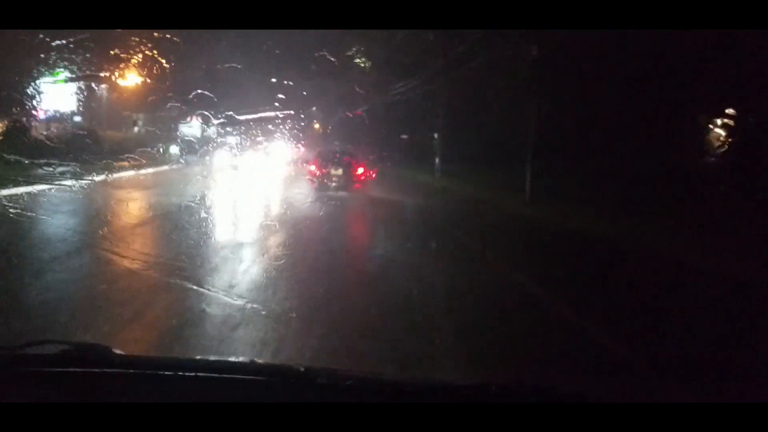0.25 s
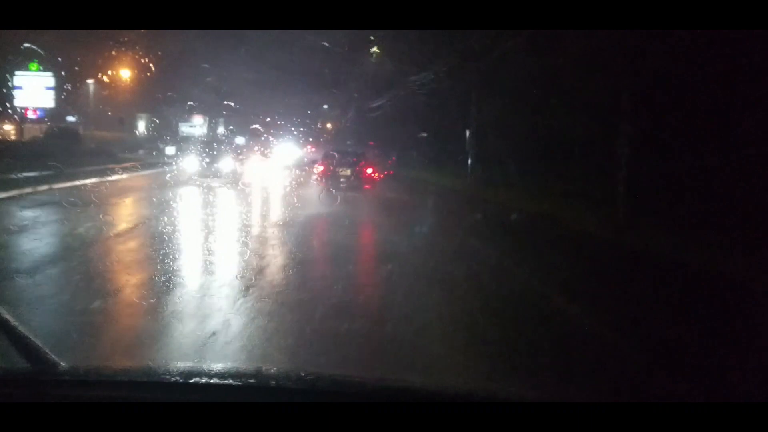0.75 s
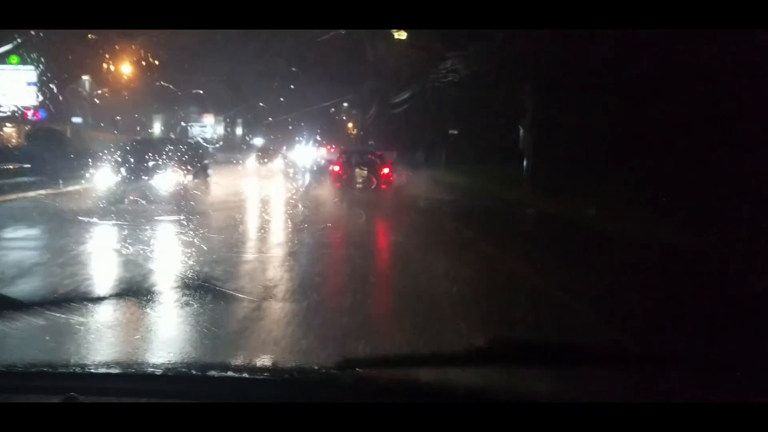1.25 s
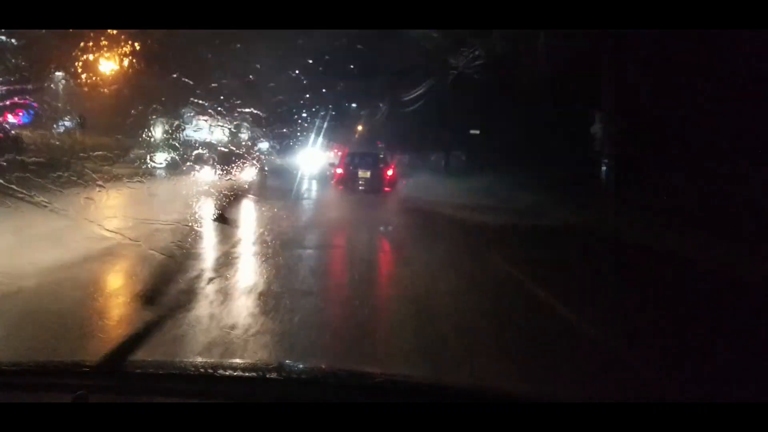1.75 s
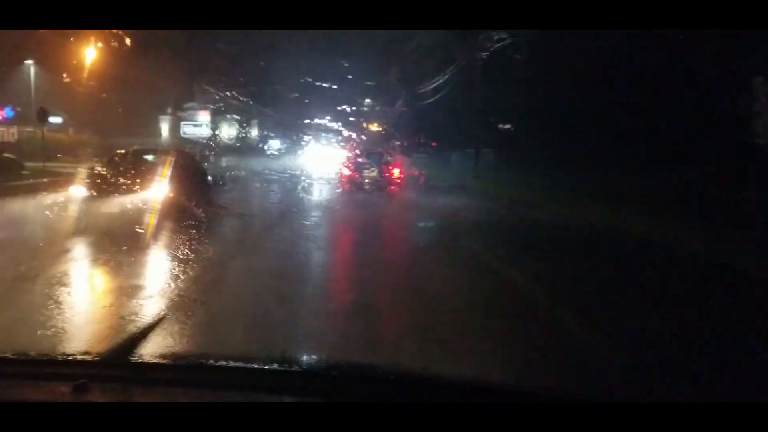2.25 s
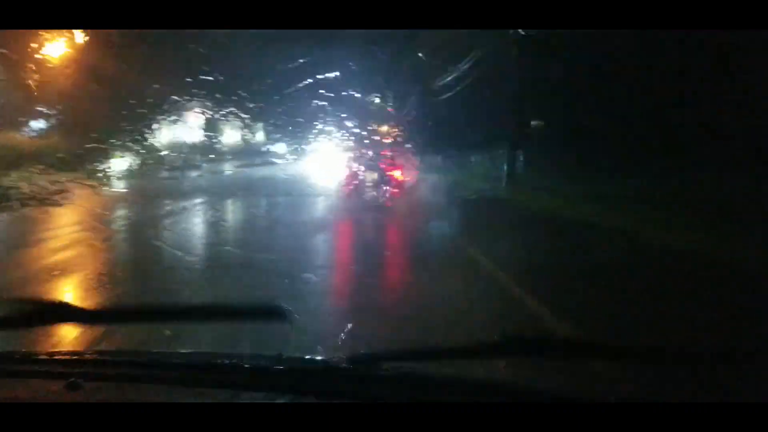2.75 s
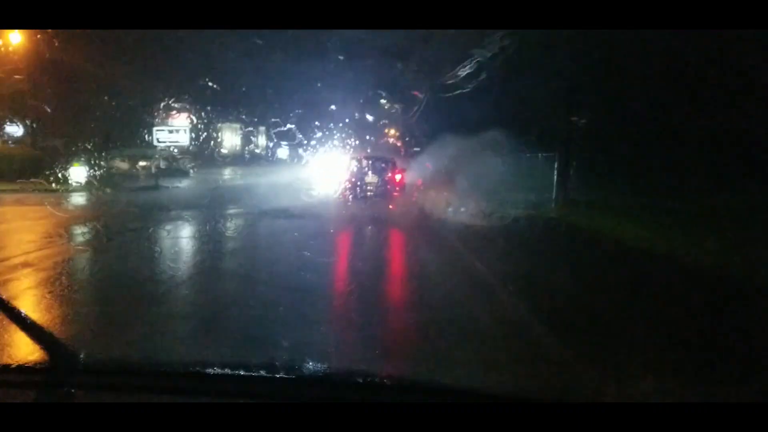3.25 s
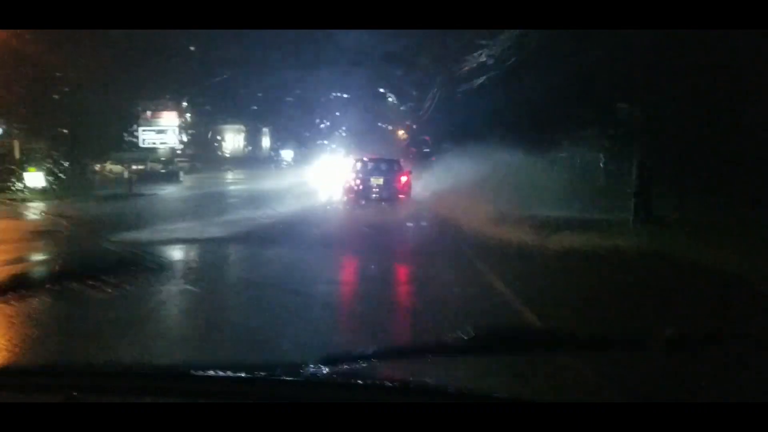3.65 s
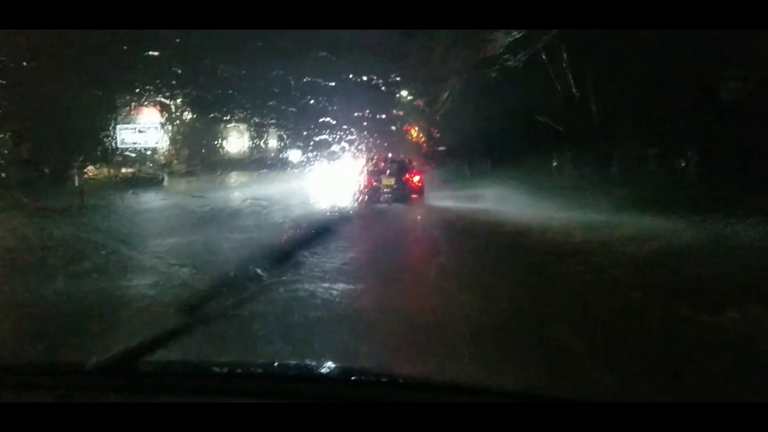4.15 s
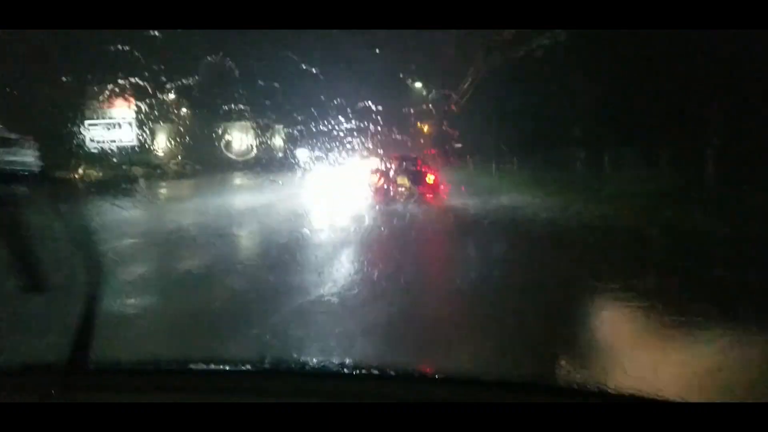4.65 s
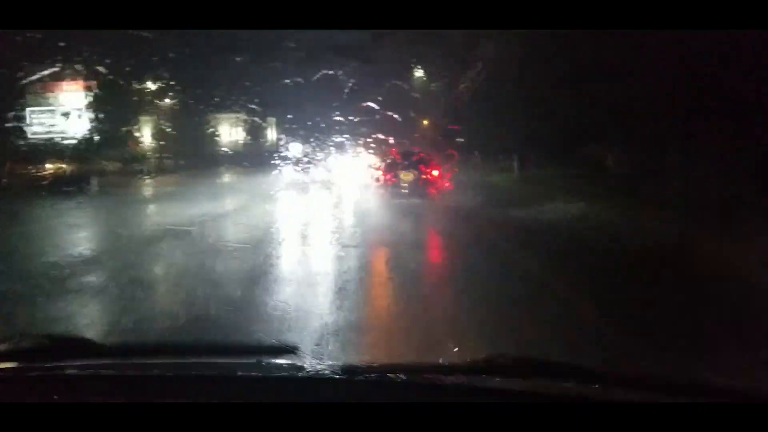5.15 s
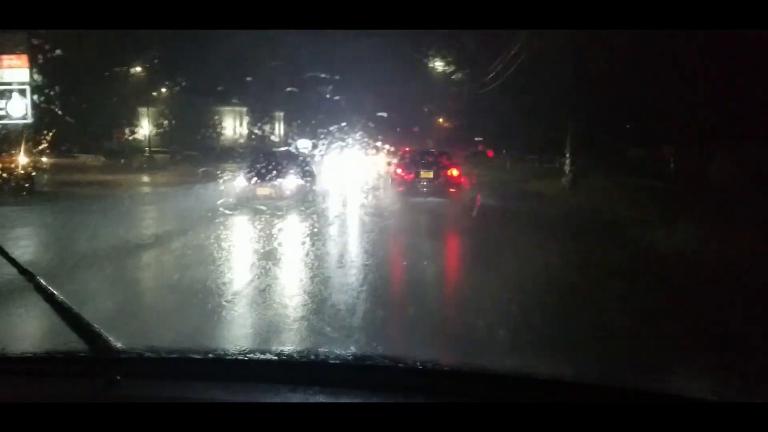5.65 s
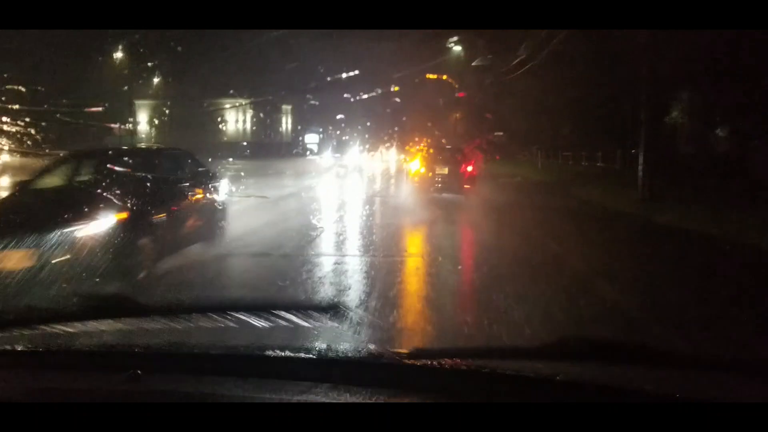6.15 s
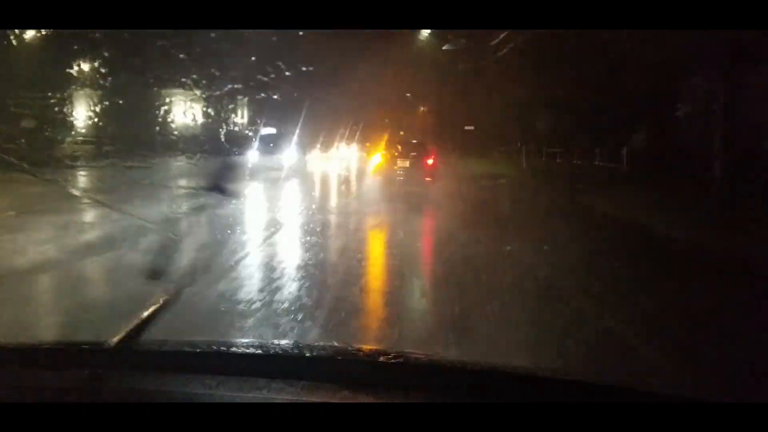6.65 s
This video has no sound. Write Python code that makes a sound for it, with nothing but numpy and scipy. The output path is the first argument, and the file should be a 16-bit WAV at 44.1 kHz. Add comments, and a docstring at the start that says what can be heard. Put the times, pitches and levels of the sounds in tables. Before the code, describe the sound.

Inside a car driving through heavy rain, drops patter on glass and drum on the roof over deep pulsing boom, tyre rumble and wiper knocks.

```python
"""A deep boom swells at once in a car driving through heavy rain: the lowest cabin air mode, nearly a sine.
Rain patters on glass and drums on the roof: coloured noise under random drop envelopes, plus single fat drops.
Wiper blades judder and knock as they turn, driving the cowl modes. Bumps ring body panels; dull knocks sound inside.
Behind lie body rumble, wet tyre roar and one puddle: shaped noise."""
import sys
import numpy as np
from scipy import signal
from scipy.fft import rfft, irfft
from scipy.io import wavfile

SR = 44100
rng = np.random.default_rng(int(sys.argv[2]) if len(sys.argv) > 2 else 0)


def wav_out(sig):
    """Save sig, one row per channel (or a flat mono array), as 16-bit PCM at SR to the path in sys.argv[1]."""
    wavfile.write(sys.argv[1], SR, np.round(np.clip(np.atleast_2d(sig).T, -1, 1) * 32767).astype(np.int16))


N = 304720

# rain between gusts: t/s, patter on glass/dB, roof drumming relative to patter/dB
RAIN_CURVE = [(0.0, -48, 5.5), (0.1, -48, 4.5), (0.6, -47, 6), (0.9, -50, 6.5), (1.2, -48, 5.5),
              (1.78, -47, 5), (1.84, -45.5, 6.5), (2.1, -46, 5), (2.45, -46, 5.5), (2.83, -46, 5),
              (2.88, -47.5, 4.5), (3.45, -46, 5), (3.6, -50.5, 5.5), (4.0, -50, 5), (4.5, -48, 6),
              (4.65, -48.5, 6), (4.85, -49, 5), (5.15, -49, 5.5), (5.45, -47.5, 6.5), (5.8, -48.5, 3),
              (5.95, -54.5, 5.5), (6.4, -53, 7.5), (6.5, -48.5, 4), (6.91, -47.5, 6.5)]
# gusts fling a sheet of rain at the car: peak t/s, patter level/dB
GUSTS = [(0.33, -47), (0.71, -51.5), (1.25, -52), (1.35, -52.5), (1.48, -47), (1.83, -47.5), (2.27, -50),
         (2.54, -50), (2.61, -45.5), (3.52, -55), (3.86, -55), (4.12, -52), (4.33, -52), (4.72, -55),
         (5.56, -51.5), (6.06, -55), (6.62, -52)]
# fat drops on glass: t/s, relative level/dB, pan L-R/dB, top octave against the rest/dB
GLASS_DROPS = [(0.0657, -38, -0.5, -16), (0.636, -31, -6, -20), (0.6918, -29, -0.5, -15),
               (0.755, -26.5, -1.5, -23), (0.839, -26, -1.0, -12.5), (1.3766, -29, 3, -22),
               (1.8127, -32, -0.5, -16), (2.0926, -27, 0.0, -22), (2.1111, -31, 1.0, -19),
               (2.2688, -26, -0.5, -15), (2.456, -28.5, -1.0, -14), (2.597, -26, -0.5, -12),
               (2.7921, -26, -4, -18), (2.831, -29, 0.0, -20), (3.236, -23.5, -0.5, -17),
               (3.4783, -25, -3, -23), (3.6414, -27, -2.5, -18), (3.664, -28, 6, -20),
               (3.7217, -30, 3, -18), (3.854, -29, 0.5, -6), (3.923, -28, 0.0, -14),
               (4.1054, -25.5, 3, -10), (4.3249, -31, 0.5, -12), (4.4754, -27, 3, -21),
               (4.8408, -28, -1.0, -18), (5.549, -28, 0.0, -11), (5.8199, -25, 0.5, -16),
               (6.0507, -28.5, -0.5, -15)]
# fat drops on roof: t/s, relative level/dB, pan L-R/dB
ROOF_DROPS = [(1.0808, -34, -5), (1.815, -29, 0), (3.4185, -28, -7), (4.172, -28, -4), (4.479, -26.5, -6),
              (4.6069, -29, -7), (6.1474, -28, -2.5)]
# colour of rain on glass: f/Hz, relative density/dB per Hz
GLASS_SPECTRUM = [(2060, -27), (3500, -1.5), (7000, -3.5), (7470, -5.5), (8700, -18.5), (11300, -55),
                  (19100, -120)]
# colour of rain on roof: f/Hz, relative density/dB per Hz
ROOF_SPECTRUM = [(590, -24.5), (1000, -2), (1220, -8.5), (1330, -3), (1460, -6.5), (1600, -3.5), (2060, 0),
                 (3030, -6.5), (4500, -12.5), (5850, -23.5), (9900, -120)]
# colour of a fat drop on glass: f/Hz, relative density/dB per Hz
TICK_SPECTRUM = [(700, -32), (1500, 4), (4000, 0.5), (7000, -3.5), (8700, -13), (10000, -50)]
# top octave of the drops: f/Hz, relative density/dB per Hz
SPRAY_SPECTRUM = [(6500, -44), (8700, -8), (12200, 1.5), (15000, -8.5), (16000, -7.5)]
# wiper blades flipping at the end of the sweep: t/s, relative knock level/dB, brightness/dB per octave,
# second blade delay/s, relative second blade level/dB, relative judder level/dB
WIPER_FLIPS = [(0.272, -15.5, -3.5, .016, -19, -39.5), (1.501, -15.5, 1.5, .008, -26, -42),
               (2.73, -39, -3, .03, -38, -47), (3.943, -13.5, -1.5, .039, -22.5, -41.5),
               (5.145, -32, -7, .024, -23, -43.5), (6.399, -18.5, 3.5, .018, -26, -45)]
# cowl modes: f/Hz, relative level/dB, t60/s
COWL_MODES = [(260, -12, 0.052), (340, 4.5, 0.054), (414, -2, 0.044), (553, -0.5, 0.028),
              (684, -0.5, 0.027), (786, -8.5, 0.032), (1010, -9.5, 0.023), (1190, -26, 0.015)]
# cabin boom between swells: t/s, f/Hz, level/dB
BOOM_CURVE = [(0.0, 41, -31), (0.15, 45.4, -23), (0.33, 43.8, -27), (0.5, 47.5, -25), (0.73, 48.65, -27),
              (0.95, 45.43, -28.5), (1.5, 45.43, -26.5), (1.79, 45.1, -28.5), (2.03, 42.07, -27),
              (2.2, 44.1, -27), (2.7, 43.66, -23.5), (3.2, 45.15, -26), (3.35, 43.3, -17.5),
              (3.62, 43.36, -31), (3.8, 43.24, -26.5), (4.48, 43.48, -23), (4.75, 43.52, -27.5),
              (5.1, 43.2, -23.5), (5.5, 42.4, -24.5), (5.97, 41.45, -28), (6.1, 43.04, -28.5),
              (6.55, 42.3, -24.5), (6.72, 42.6, -28), (6.83, 48, -51), (6.91, 50, -33)]
# rough spots in the road: peak t/s, boom level/dB, rumble level/dB, rise/s, fall/s
ROAD_SWELLS = [(0.005, -18.5, -21.5, 0.027, .03), (0.15, -21, -30, .04, 0.088),
               (0.4, -21, -28, 0.027, 0.035), (0.57, -27, -36, 0.047, 0.026),
               (0.73, -22.5, -48, 0.057, .07), (0.94, -22, -31, 0.06, .06), (1.23, -25, -30, .1, .1),
               (1.52, -30, -30, .04, .03), (1.72, -29, -29, 0.067, .035), (2.0, -18.5, -35, 0.037, 0.028),
               (2.12, -19, -33, 0.023, 0.033), (2.21, -21, -40, 0.033, .1), (2.58, -22, -28, 0.067, 0.066),
               (2.83, -11, -24, .03, 0.046), (2.96, -19, -36, 0.036, 0.038),
               (3.04, -19.5, -30, .015, 0.046), (3.31, -21, -24, 0.044, .05), (3.41, -20, -26, .02, 0.044),
               (3.68, -11.5, -24, 0.023, 0.062), (3.92, -34, -31, 0.027, 0.051),
               (4.3, -16.5, -27, 0.046, .03), (4.535, -11, -28, 0.029, 0.067),
               (4.68, -17.5, -34, 0.055, 0.0303), (4.78, -22, -31, 0.029, 0.051),
               (4.86, -21, -31, 0.054, 0.039), (4.94, -17, -40, 0.042, 0.027), (5.14, -24, -28, 0.062, .06),
               (5.39, -23.5, -38, 0.036, 0.031), (6.04, -28, -32, 0.029, .03),
               (6.18, -22.5, -45, 0.032, .035), (6.271, -9.5, -25, 0.016, 0.058),
               (6.41, -19, -25, .03, 0.027), (6.52, -23.5, -34, .04, 0.075), (6.89, -21.5, -25, 0.029, .04)]
# bumps under the wheels, one row per panel set ringing: t/s, relative level/dB, ringing f/Hz
BUMPS = [(0.306, -18.5, 79.5), (0.31, -22.5, 176.6), (1.555, -26.5, 154), (1.705, -22, 176),
         (2.176, -20.5, 102.6), (2.542, -19, 83.7), (2.775, -19.5, 121.8), (3.02, -20, 107.3),
         (3.284, -13.5, 118), (3.401, -15, 79), (3.655, -16.5, 65), (3.666, -21.5, 121.6),
         (4.249, -17, 83.8), (4.56, -20.5, 159.6), (4.82, -21, 118.5), (5.158, -20, 148),
         (5.988, -13.5, 76.7), (6.249, -20, 120)]
# dull knocks in the cabin: t/s, relative level/dB, ringing f/Hz
CABIN_KNOCKS = [(0.151, -29, 333), (2.192, -36, 335), (2.8, -34, 279), (3.23, -23.5, 275),
                (4.492, -29, 284.4)]
# road between swells: t/s, body rumble/dB, wet tyre roar/dB
ROAD_CURVE = [(0.0, -32, -34.5), (0.4, -31, -35.5), (0.8, -35.5, -38), (1.1, -35, -37), (1.6, -33, -38),
              (1.8, -31.5, -35.5), (2.4, -33.5, -36.5), (2.7, -31, -33.5), (3.1, -30, -36.5),
              (3.45, -29, -37), (3.8, -35, -38.5), (4.25, -32, -39.5), (4.6, -29.5, -34.5), (4.8, -30, -37),
              (5.2, -33.5, -37.5), (5.6, -34.5, -37.5), (6.2, -35, -41.5), (6.45, -32, -39),
              (6.91, -34.5, -39.5)]
# broad body rumble: f/Hz, relative density/dB per Hz
RUMBLE_SPECTRUM = [(32, -33), (55, -9.5), (70, -4), (124, -4.5), (173, -8.5), (210, -34), (260, -18),
                   (340, -66), (570, -120)]
# body modes fed by the road: f/Hz, width/Hz, relative level/dB
BODY_MODES = [(75.3, 12, 1.5), (121.9, 6.3, 3.5), (147.5, 5.7, -2), (173.8, 4.4, 0), (215, 3.3, -21)]
# wet tyre roar: f/Hz, relative density/dB per Hz
ROAR_SPECTRUM = [(120, -7), (200, 0), (226, -8), (323, -2.5), (377, -6.5), (1020, -15), (1170, -20.5),
                 (1400, -23), (1820, -22.5), (3080, -120)]
# puddle splash: f/Hz, relative density/dB per Hz
SPLASH_SPECTRUM = [(82, -29), (140, 5), (211, 0), (342, -5.5), (430, -16), (485, -8.5), (834, -19),
                   (1600, -18.5), (2500, -24), (3250, -55), (5500, -120)]
# stereo width of diffuse noise: f/Hz, side minus mid/dB
SIDE_TO_MID = [(60, -19), (110, -30), (200, -10), (380, -7.5), (700, -2.5), (1290, 3), (2380, 0),
               (4400, 1.5), (8120, 0), (15000, 0.5)]
# stereo balance of diffuse noise: f/Hz, L-R/dB
LEFT_TO_RIGHT = [(60, -2.5), (110, -1), (200, 1), (380, -0.5), (700, 1), (1290, -3), (2380, -2),
                 (4400, 1.5), (8120, -1.5), (15000, 2)]

GUST_RISE_S, GUST_FALL_S = 0.017, 0.077
BOOM_WAVER_DB, RUMBLE_WAVER_DB, SHOWER_WAVER_DB, DRUM_WAVER_DB = 1.3, 1.1, 0.4, 0.38
JUDDER_LEAD_S, JUDDER_TAIL_S = 0.033, 0.061
PUDDLE_S, PUDDLE_DB, PUDDLE_RISE_S, PUDDLE_FALL_S = 4.65, -28.5, 0.11, 0.051
LEFT_BASS_LAG_S = 0.00021
CUTOFF_HZ = 15830


def rain():
    """Thousands of drops; glass, spray and roof share one shower envelope and add their own drops."""
    glass_db, roof_db = in_time(RAIN_CURVE)
    gusts = [(s, level_db, GUST_RISE_S, GUST_FALL_S) for s, level_db in GUSTS]
    heaviness = swelling(glass_db + SHOWER_WAVER_DB * drift(12.0), gusts)
    roof_db = roof_db + DRUM_WAVER_DB * drift(7.0)
    shower = patter(400, spread_db=2.5, t60_s=0.096)
    fine = patter(990, spread_db=1.5, t60_s=0.021)
    glass = diffuse(GLASS_SPECTRUM, shower + 1.3 * fine)
    spray_drops = patter(500, spread_db=2.5, t60_s=0.024)
    spray = diffuse(SPRAY_SPECTRUM, shower + 0.59 * fine + spray_drops)
    roof_drops = patter(1500, spread_db=1.5, t60_s=0.19)
    roof = diffuse(ROOF_SPECTRUM, shower + 1.3 * roof_drops)
    layers = amp(-1.0) * glass + amp(-6.5) * spray + amp(roof_db) * roof
    return heaviness * layers + fat_drops()


def patter(drops_per_s, spread_db, t60_s):
    """Envelope of random drops of uneven size, each a short dying burst; rms 1."""
    sizes = amp(2 * spread_db * np.minimum(rng.exponential(1, N), 5))
    hits = sizes * (rng.random(N) < drops_per_s / SR)
    power = dying(np.tile(hits, 2), t60_s)[N:]    # second pass: starts already raining
    return rms_one(np.sqrt(power))


def fat_drops():
    """Single large drops excite glass and roof; on glass the top octave dies sooner."""
    s, level_db, pan_db, top_db = np.transpose(GLASS_DROPS)
    glass = drop_bursts(s, level_db + 2.0, pan_db, TICK_SPECTRUM, t60_s=0.019)
    spray = drop_bursts(s, level_db + top_db + 13, pan_db, SPRAY_SPECTRUM, t60_s=0.0047)
    s, level_db, pan_db = np.transpose(ROOF_DROPS)
    roof = drop_bursts(s, level_db + 6, pan_db, ROOF_SPECTRUM, t60_s=0.045)
    return glass + spray + roof


def drop_bursts(s, level_db, pan_db, spectrum, t60_s):
    """Each impact is a coloured noise tick with a fainter, longer wash after it."""
    power = np.zeros((2, N))
    side_db = pan_db / 2 * np.array([[1], [-1]])
    power[:, (s * SR).astype(int)] = amp(2 * (level_db + side_db))
    envelope = np.sqrt(dying(power, t60_s) + amp(-22) * dying(power, 5.8 * t60_s))
    burst = envelope * rng.standard_normal((2, N))
    colour = at_hz(spectrum)
    return irfft(rfft(burst) * colour / colour.max(), N)


def wipers():
    """The rubber judders as the blade slows and turns, and knocks as it flips; both drive the cowl modes."""
    out, length, lead = np.zeros(N), SR // 2, SR // 8
    t = np.arange(length) / SR - 1 / 8    # 0 at the flip
    luck = rng.standard_normal((len(WIPER_FLIPS), len(COWL_MODES), 3))
    rubber = rng.standard_normal((len(WIPER_FLIPS), length))
    for flip, strengths, noise in zip(WIPER_FLIPS, luck, rubber):
        s, knock_db, tilt_db, second_delay_s, second_db, judder_db = flip
        start = round(s * SR) - lead
        bell = np.exp(-np.where(t < 0, t / JUDDER_LEAD_S, t / JUDDER_TAIL_S) ** 2)
        judder = amp(judder_db) * noise * bell
        for (hz, mode_db, t60_s), hits in zip(COWL_MODES, strengths):
            drive = judder / np.sqrt(t60_s * SR / 30)
            # lip flips, then lands 130 samples later
            drive[lead + np.array([0, 130])] += amp(knock_db - 12.5 + 2 * hits[:2])
            drive[lead + round(second_delay_s * SR)] += amp(second_db - 5.5 + 2 * hits[2])
            gain = amp(mode_db + tilt_db * np.log2(hz / 400))
            out[start:start + length] += gain * ring(drive, hz, t60_s)
    # soft rubber, heard through glass
    return -signal.sosfilt(signal.butter(4, 1250, fs=SR, output="sos"), out)


def boom():
    """The lowest air mode of the cabin, nearly a sine, swells on rough spots."""
    hz, level_db = in_time(BOOM_CURVE)
    swells = np.delete(ROAD_SWELLS, 2, axis=1)    # without rumble level
    level = swelling(level_db + BOOM_WAVER_DB * drift(9.9), swells)
    return np.sqrt(2) * level * np.sin(2 * np.pi * np.cumsum(hz) / SR)


def bumps():
    """Blows under the wheels ring the body panels."""
    return rung(BUMPS, t60_s=0.35, softness=0.65)


def cabin_knocks():
    """Dull blows in the cabin ring briefly."""
    return rung(CABIN_KNOCKS, t60_s=0.084, softness=0.52)


def rung(events, t60_s, softness):
    """Each blow rings one mode; the push is soft, so the ring swells over a cycle or so."""
    out = np.zeros(N)
    for s, level_db, hz in events:
        click = np.zeros(SR)
        click[0] = amp(level_db)
        start = round(s * SR)
        low_pass = signal.butter(2, hz / softness, fs=SR, output="sos")
        tone = ring(click, hz, t60_s)[:N - start]
        out[start:start + SR] += signal.sosfilt(low_pass, tone)
    return out


def road():
    """Tyres on wet asphalt: body rumble swelling on rough spots, roar, and one puddle."""
    rumble_db, roar_db = in_time(ROAD_CURVE)
    swells = np.delete(ROAD_SWELLS, 1, axis=1)    # without boom level
    rumble_level = swelling(rumble_db + RUMBLE_WAVER_DB * drift(2.3), swells)
    puddle = puddle_splash()
    rumble = rumble_level * diffuse(body_spectrum(), 1)
    roar = amp(roar_db) * diffuse(ROAR_SPECTRUM, 1)
    return rumble + roar + puddle


def puddle_splash():
    """Water thrown up as many small bursts under one bell."""
    level = swelling(-90, [(PUDDLE_S, PUDDLE_DB, PUDDLE_RISE_S, PUDDLE_FALL_S)])
    return level * diffuse(SPLASH_SPECTRUM, patter(900, spread_db=2.5, t60_s=0.077))


def body_spectrum():
    """Resonant peaks of the body modes over broad road rumble; f/Hz, relative density/dB per Hz."""
    hz = np.geomspace(20, 600, 400)
    rumble_hz, rumble_db = np.transpose(RUMBLE_SPECTRUM)
    broad = amp(np.interp(np.log(hz), np.log(rumble_hz), rumble_db) - 9.0)
    peaks = sum(amp(2 * level_db) / (1 + (2 * (hz - mode_hz) / width_hz) ** 2) ** 2
                for mode_hz, width_hz, level_db in BODY_MODES)
    return np.transpose([hz, 10 * np.log10(broad ** 2 + amp(-20.0) * peaks)])


def diffuse(spectrum, envelope):
    """Enveloped coloured noise, alike at both ears in the bass, unrelated in the treble; mid rms 1."""
    mid, side = rfft(rng.standard_normal((2, N)) * envelope) * at_hz(spectrum)
    side = side * at_hz(SIDE_TO_MID)
    lean = np.sqrt(at_hz(LEFT_TO_RIGHT))
    pair = irfft(np.array([(mid + side) * lean, (mid - side) / lean]), N)
    return pair / np.sqrt(np.mean(pair.mean(axis=0) ** 2))


def ring(clicks, hz, t60_s):
    """Two-pole resonator: a unit click starts a decaying sine of height 1."""
    r, w = amp(-60 / (t60_s * SR)), 2 * np.pi * hz / SR
    return signal.lfilter([0, np.sin(w)], [1, -2 * r * np.cos(w), r * r], clicks + 1e-18)


def dying(power, t60_s):
    """Each impulse of power decays exponentially in the padded cabin."""
    return signal.lfilter([1], [1, -amp(-120 / (t60_s * SR))], power + 1e-18)


def swelling(bed_db, events):
    """Gain of a bed plus bells (t/s, level/dB, rise/s, fall/s); powers add."""
    power, t = amp(2 * bed_db), np.arange(N) / SR
    for peak_s, level_db, rise_s, fall_s in events:
        x = (t - peak_s) / np.where(t < peak_s, rise_s, fall_s)
        power = power + amp(2 * level_db) * np.exp(-2 * x ** 2)
    return np.sqrt(power)


def drift(corner_hz):
    """Slow chance: noise at every 40th sample through a double one-pole low-pass; rms 1."""
    r = np.exp(-80 * np.pi * corner_hz / SR)
    noise = rng.standard_normal(N // 40 + 2002)
    slow = signal.lfilter([1], [1, -2 * r, r * r], noise)[2000:]    # skip the settling
    return np.interp(np.arange(N) / 40, np.arange(len(slow)), rms_one(slow))


def in_time(rows):
    """Columns of a curve, interpolated at every sample."""
    s, *columns = np.transpose(rows)
    return [np.interp(np.arange(N) / SR, s, c) for c in columns]


def at_hz(points):
    """Spectrum as gain on the FFT grid, interpolated in dB over log frequency."""
    hz, level_db = np.transpose(points)
    grid_hz = np.maximum(np.arange(N // 2 + 1) * SR / N, 1)
    return amp(np.interp(np.log(grid_hz), np.log(hz), level_db))


def amp(db):
    """dB to amplitude gain."""
    return 10 ** (np.asarray(db) / 20)


def rms_one(x):
    """Scales to rms 1."""
    return x / np.sqrt(np.mean(x ** 2) + 1e-20)


def scene():
    """All sources at the left and right ear; the lows reach the left one later."""
    lows = boom() + bumps() + cabin_knocks()
    late = np.interp(np.arange(N) - LEFT_BASS_LAG_S * SR, np.arange(N), lows)
    lows_pair = np.array([late, lows]) * amp([[0.45], [-0.45]])
    wiper_pair = wipers() * amp([[-0.3], [0.3]])
    return rain() + wiper_pair + lows_pair + road()


def record(dry):
    """Steep elliptic low-pass."""
    return signal.sosfilt(signal.ellip(14, 0.5, 70, CUTOFF_HZ, fs=SR, output="sos"), dry)


dry = scene()
out = record(dry)
wav_out(out)
```